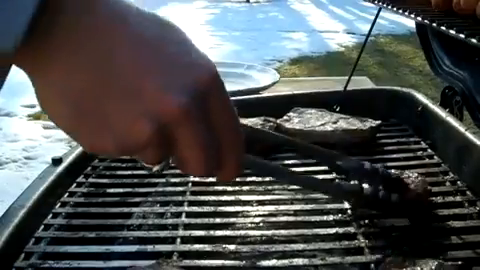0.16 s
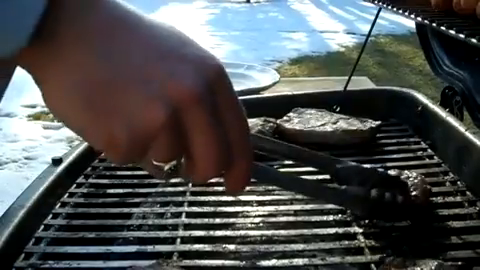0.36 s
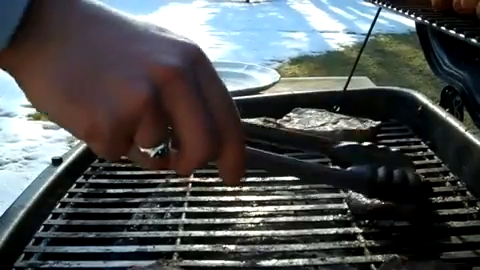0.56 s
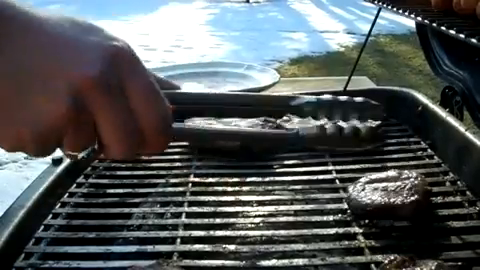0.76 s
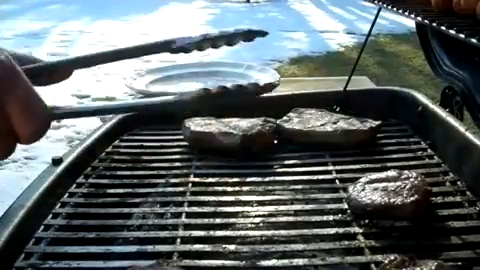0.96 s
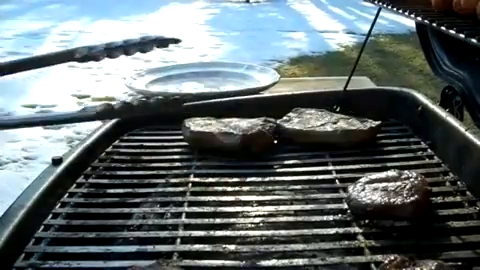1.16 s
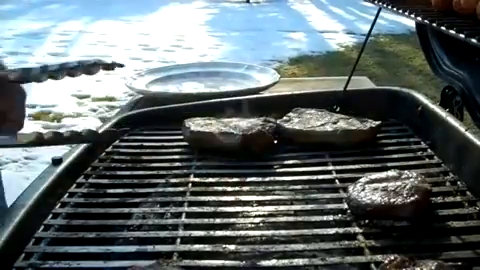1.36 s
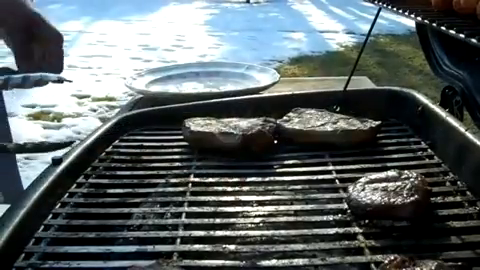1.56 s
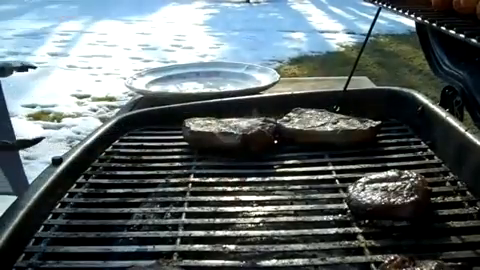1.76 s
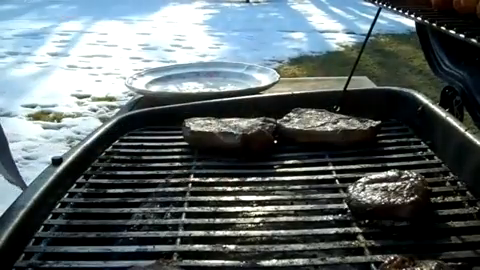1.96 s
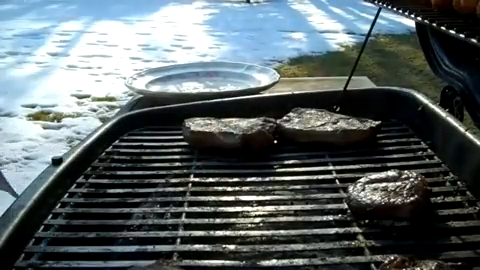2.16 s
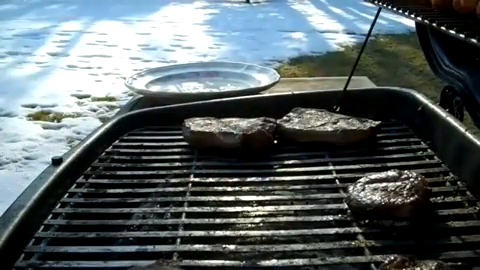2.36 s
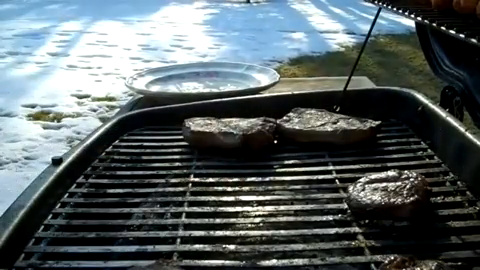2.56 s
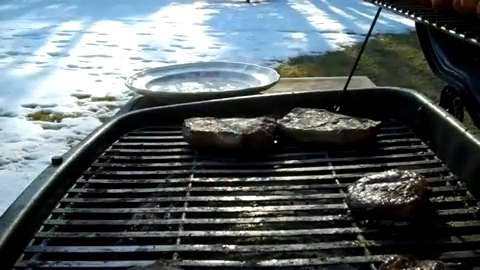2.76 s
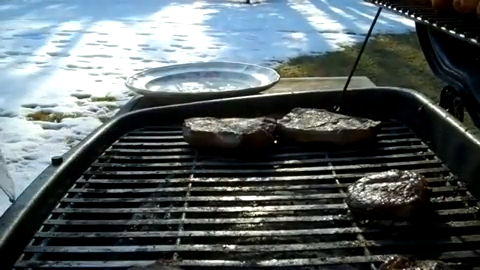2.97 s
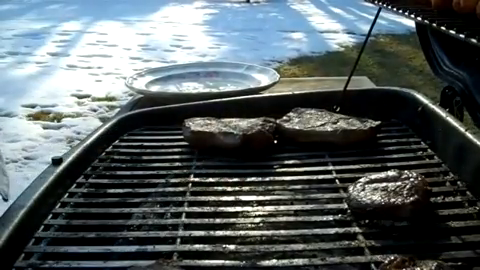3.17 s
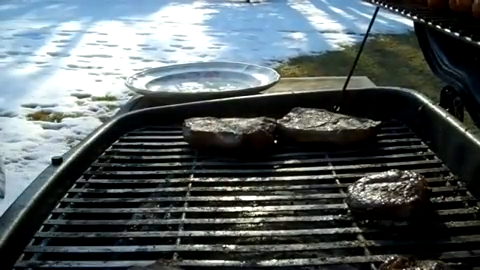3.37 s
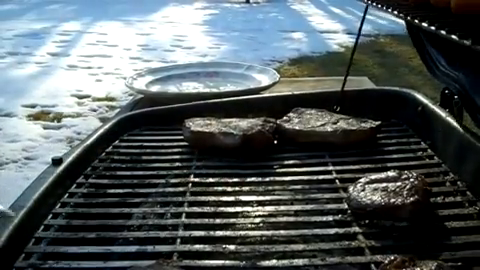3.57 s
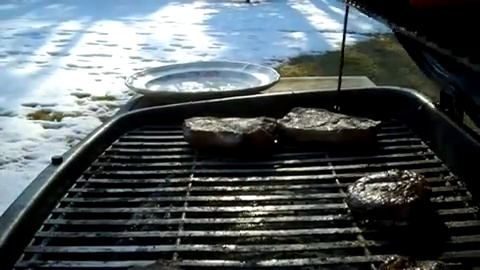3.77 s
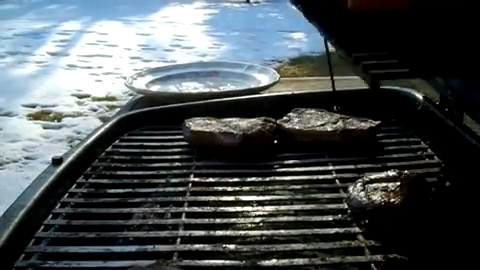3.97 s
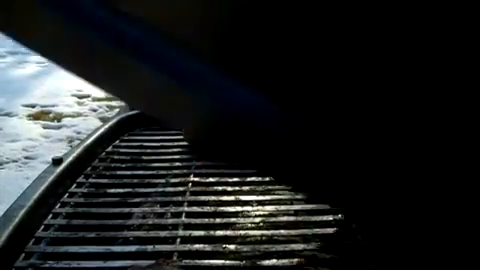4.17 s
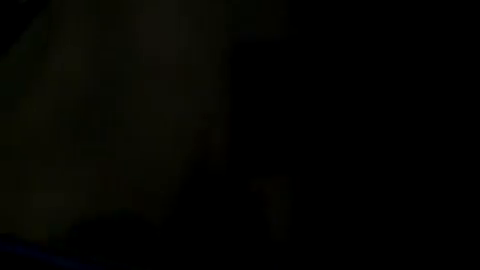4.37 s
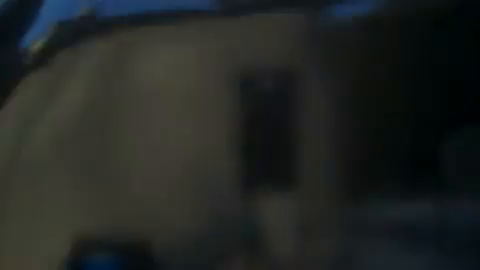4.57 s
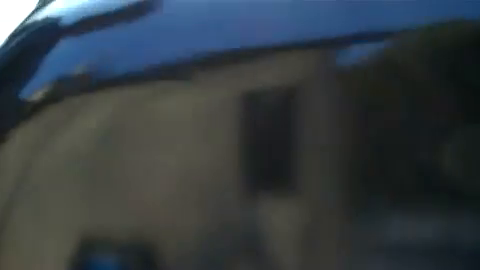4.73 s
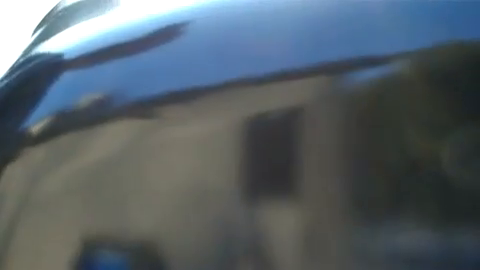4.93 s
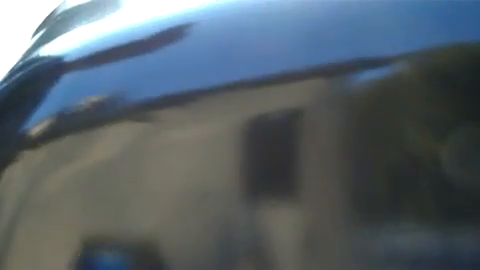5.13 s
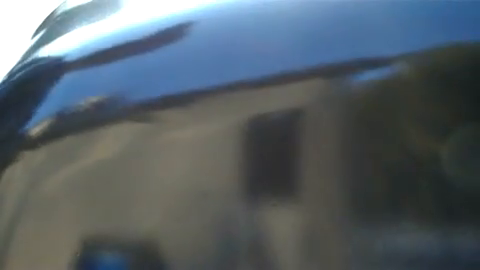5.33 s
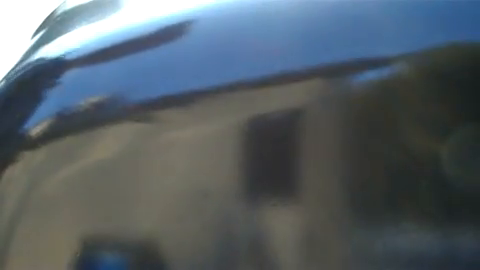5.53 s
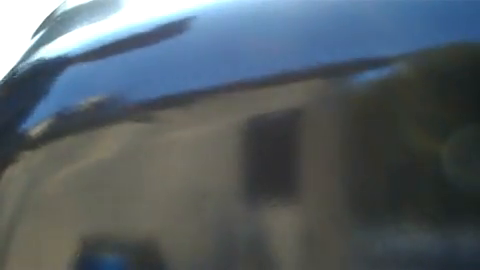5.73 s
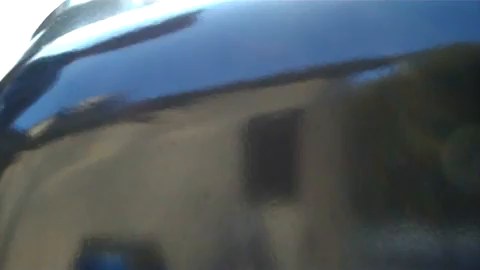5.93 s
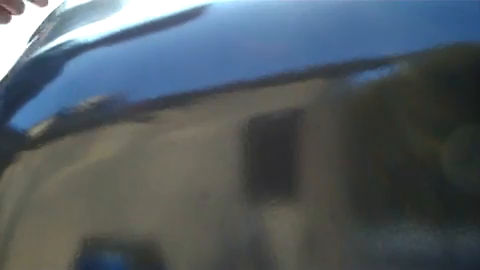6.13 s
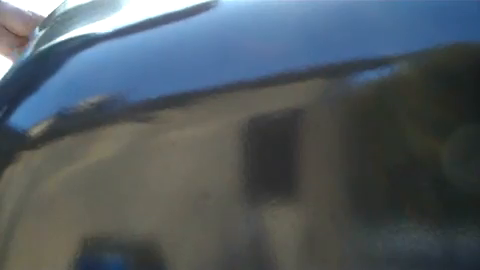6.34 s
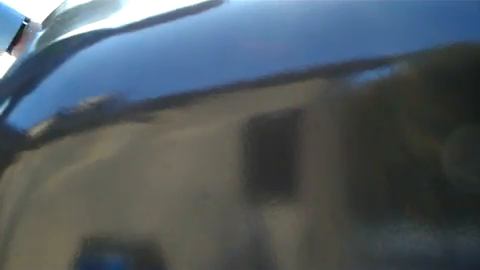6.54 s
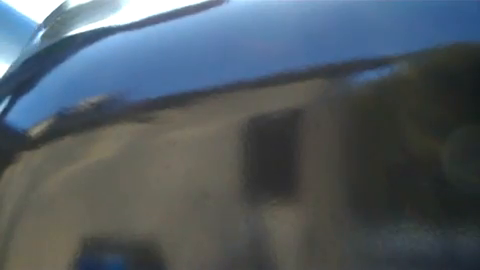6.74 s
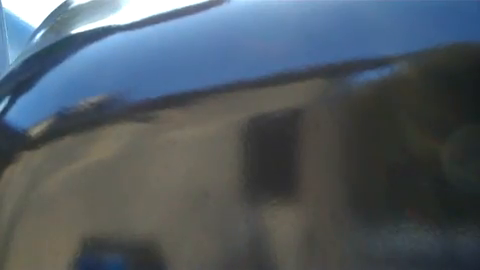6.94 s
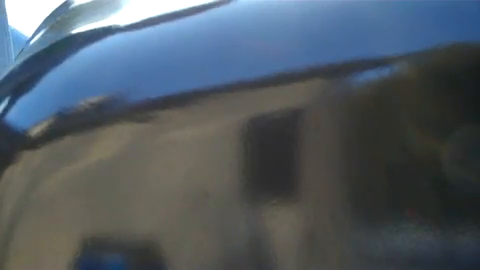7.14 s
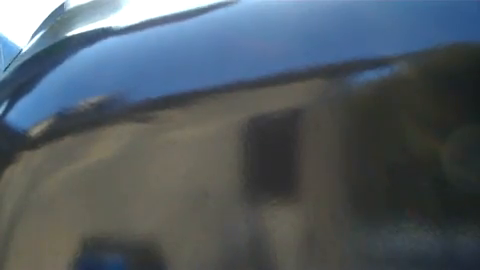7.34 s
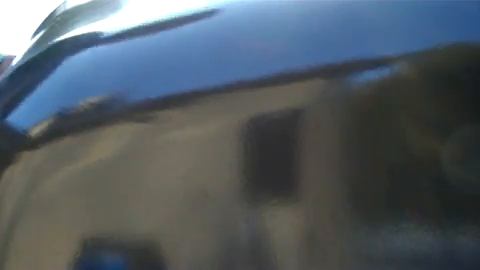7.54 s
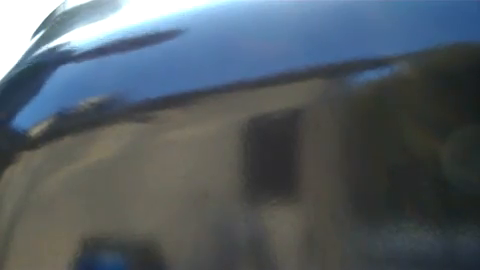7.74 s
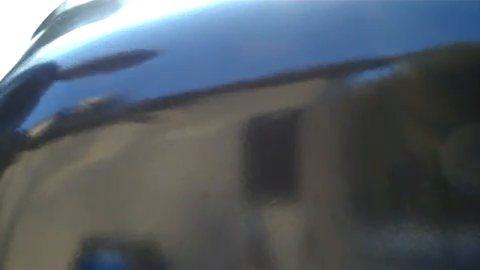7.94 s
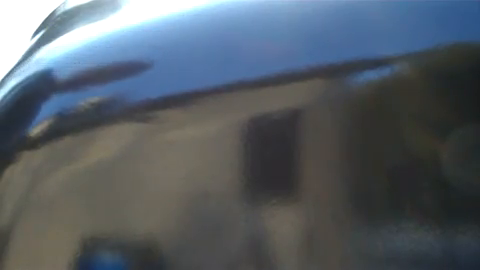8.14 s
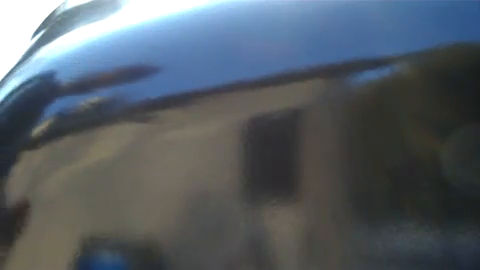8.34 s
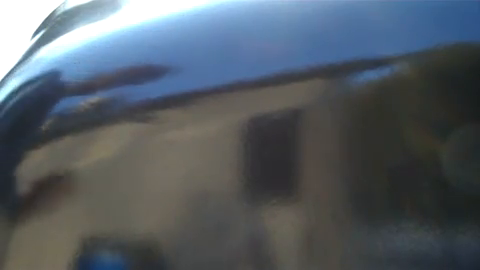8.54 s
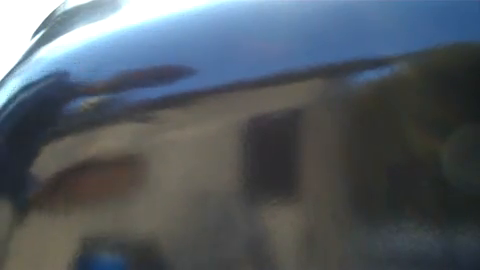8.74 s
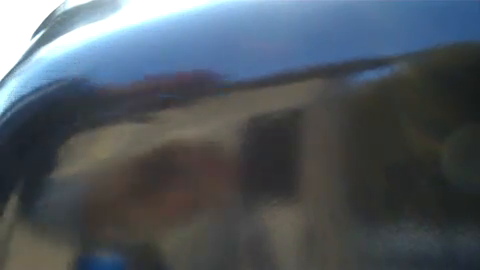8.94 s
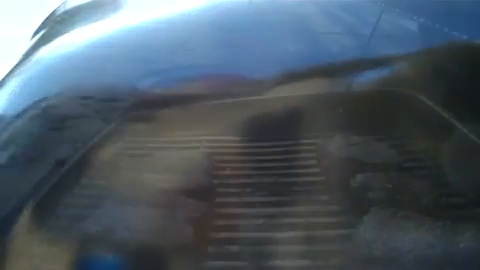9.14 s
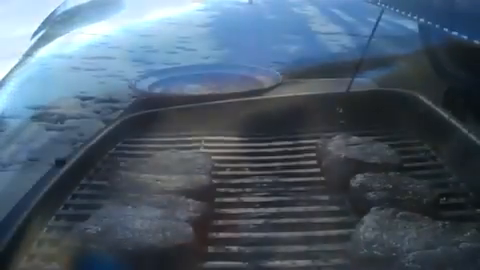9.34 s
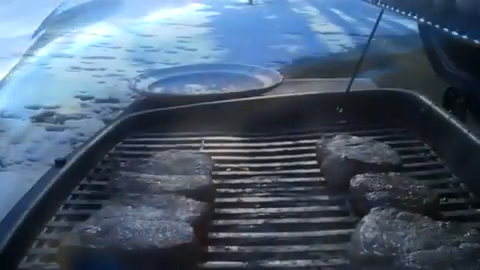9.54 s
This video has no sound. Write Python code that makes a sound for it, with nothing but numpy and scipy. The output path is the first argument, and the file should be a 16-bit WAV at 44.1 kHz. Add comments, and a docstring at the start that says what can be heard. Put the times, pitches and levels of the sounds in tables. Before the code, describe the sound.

Crackling fat hiss and flapping gas flames, tong ticks and scrapes, a ringing metal lid slam, a quieter muffled sizzle, then a bright rack clatter.

```python
"""At an outdoor gas grill steaks sizzle from the start, as dense random bubble pops over smooth hiss.
Noise in the flames' colour flutters and flaps; metal ticks, and tongs scrape as swelling, gritty noise.
The steel lid clanks shut in ringing modes and noise bursts; the fat is muffled and the flames settle.
A wire rack is knocked and rattles to rest, ringing over shaken firebox noise; at the end the lid lifts.
Two small microphone ports hear it, each with its own treble peaks, modelled as a filter per channel."""
import sys
import numpy as np
from scipy import signal
from scipy.fft import rfft, irfft
from scipy.io import wavfile
from scipy.ndimage import map_coordinates

SR = 44100
rng = np.random.default_rng(int(sys.argv[2]) if len(sys.argv) > 2 else 0)


def generate_wav(sig):
    """Save sig (samples, or channels by samples) to the path in sys.argv[1] as 16-bit PCM at SR."""
    pcm = np.round(np.clip(np.atleast_2d(sig).T, -1, 1) * 32767).astype(np.int16)
    wavfile.write(sys.argv[1], SR, pcm)


N = 427769
T = np.arange(N) / SR  # time in the scene, s
RING = T[:SR]  # time since a hit, s
TOP_HZ = 9700

# the flames settle once the lid keeps the air off: (start [s], end [s])
CALMING_S = (4.4, 5.97)


def undb(db):
    """Decibels to gain."""
    return 10 ** (np.asarray(db) / 20)


def unit(x):
    """Scale to rms 1."""
    return x / np.sqrt(np.mean(x ** 2))


def rfft_hz(x):
    """Frequency of each spectral bin."""
    return np.fft.rfftfreq(x.shape[-1], 1 / SR)


def colour(x, points):
    """Filter by (Hz, dB) points; the sound falls away 20 dB per octave beyond both ends."""
    hz, db = np.transpose(points)
    octave, known = np.log2(rfft_hz(x) + 1), np.log2(hz)
    beyond = np.abs(octave - np.clip(octave, known[0], known[-1]))
    gain = undb(np.interp(octave, known, db) - 20 * beyond)
    return irfft(rfft(x) * gain, x.shape[-1])


def spread(pair, alike_hz=3000):
    """Two unrelated signals become left and right: alike in the bass, apart in the treble."""
    alike = .97 / (1 + (rfft_hz(pair) / alike_hz) ** 2)
    mid, side = rfft(pair) * np.sqrt([(1 + alike) / 2, (1 - alike) / 2])
    return irfft(np.array([mid + side, mid - side]), pair.shape[-1])


def noise(points, size=N):
    """Coloured stereo noise of rms 1."""
    return unit(colour(spread(rng.standard_normal((2, size))), points))


def walk(rate):
    """Smooth random wandering of rms 1, with `rate` random knots per second."""
    knots = rng.standard_normal(4096)
    return unit(map_coordinates(knots, [T * rate], order=2, mode="wrap"))


def swell(age):
    """Rise to 1 at age 1, then die away."""
    age = np.maximum(age, 0)
    return age * np.exp(1 - age)


def fade(t60):
    """Exponential decay over one second, down 60 dB after t60 seconds."""
    return np.exp(-np.log(1000) * RING / t60)


def blow(x, db):
    """Set the level of the first 30 ms of a hit."""
    return x * undb(db) / np.sqrt(np.mean(x[:, :SR * 3 // 100] ** 2))


def modes(table, scatter_db, split, apart_hz=5000):
    """Ring of a struck body: close pairs of modes, weighted anew by each blow."""
    out = 0
    pairs = table + table
    for (hz, db, t60), draw in zip(pairs, rng.standard_normal((len(pairs), 4))):
        size, phase, lag, detune = draw
        # high modes reach the two ports out of step
        angle = np.pi * phase + np.array([[1], [-1]]) * lag * hz / apart_hz
        wave = np.sin(2 * np.pi * hz * (1 + split * detune) * RING + angle)
        out = out + undb(db + scatter_db * size) * fade(t60) * wave
    return out


def sheet(ripple_db=5, order=330):
    """The crowded upper resonances of sheet steel, as random (Hz, dB) filter points."""
    ripple = ripple_db * np.clip(rng.standard_normal(order), -2, 2)
    return np.transpose([np.linspace(30, TOP_HZ, order), ripple])


def add(out, s, sound):
    """Mix a sound in at time s."""
    start = int(s * SR)
    out[:, start:start + sound.shape[1]] += sound[:, :N - start]


def sizzle():
    """Thousands of tiny steam bubbles burst in the fat, over the smooth hiss of their echoes in the firebox."""
    # colour of the frying fat: (frequency [Hz], density [dB per Hz])
    fat = [(700, -6), (1700, -10.5), (2600, 1.5), (4000, 4), (6000, -2.5), (8000, -2.5), (9700, -2.5)]
    # fat heard from outside the shut lid, against the open grill: (frequency [Hz], gain [dB])
    muffle = [(100, -4), (2000, -3), (4500, -2), (6000, 0.5), (8000, 0), (9700, -5)]
    # the lid comes down and lifts again: (time [s], share shut [0-1])
    lid_shut = [(4.15, 0), (4.65, 0.87), (9.25, 0.91), (9.64, 0)]
    # juice runs onto hot metal, seethes and boils away:
    # (time [s], added level before waver [dB], time to peak [s])
    seethes = [(.25, -43, 0.11), (.88, -50.5, 0.15), (5.2, -56.5, 0.47)]
    pops_per_s, pop_spread_db, pop_cap_db = 9000, 2.7, 11
    hiss_db, ripple_db = -1, 2.0
    fry_db, lid_loss_db, heat_db_per_s = -47, -11.5, 0.67
    flicker_db, drift_db = 0.74, 0.23

    burst = rng.random(N) < pops_per_s / SR
    size = undb(np.minimum(pop_spread_db * rng.exponential(size=N), pop_cap_db))
    pops = unit(colour(spread(burst * size * rng.standard_normal((2, N))), fat))
    hiss = undb(hiss_db) * noise(fat)
    # reflections from the steel walls ripple the spectrum
    fry = unit(colour(pops + hiss, sheet(ripple_db)))

    shut = np.clip(np.interp(T, *np.transpose(lid_shut)), 0, 1)
    # the longer the lid stays down, the hotter the fat
    heat_db = heat_db_per_s * np.cumsum(shut) / SR
    power = undb(fry_db + lid_loss_db * shut + heat_db) ** 2
    for s, db, rise_s in seethes:
        power = power + (undb(db) * swell((T - s) / rise_s)) ** 2
    waver = undb(flicker_db * walk(34) + drift_db * walk(3))
    heard = (1 - shut) * fry + shut * colour(fry, muffle)
    return heard * np.sqrt(power) * waver


def flames():
    """The draught makes the flames flutter and now and then flap; under the lid the even gas flow is left."""
    # flames in the hollow of the grill: (frequency [Hz], density [dB per Hz])
    flame_colour = [(40, -23), (100, -14), (200, -1), (330, -6), (420, 3), (600, 2.5), (700, -2), (850, 0),
                    (1050, -5.5), (1230, 0.5), (1400, -7), (1800, -13), (4000, -14)]
    # steady gas flow in the firebox: (frequency [Hz], density [dB per Hz])
    gas_colour = [(25, -2), (70, -6.5), (130, -4.5), (190, 8.5), (270, -3), (500, -3), (800, -2.5),
                  (1100, -3), (1280, -2), (1500, -5.5), (3000, -5.5)]
    # draught on the flames under the open lid: (time [s], level before trim [dB])
    draught = [(0, -54.5), (0.5, -49.5), (0.92, -58), (1.13, -47), (1.3, -53), (1.6, -51.5), (1.72, -46.5),
               (2.03, -46), (2.15, -54.5), (2.7, -51), (3.4, -46), (3.6, -45.5), (3.7, -51), (3.85, -47)]
    # loudest flaps of the flame: (time [s], peak before trim [dB], length at full strength [s])
    flaps = [(0.116, -33, 0.031), (0.261, -34.5, 0.028), (0.321, -37, 0.03), (0.41, -36.5, 0.027),
             (0.805, -33.5, 0.032), (0.964, -36.5, 0.032), (1.011, -34, 0.03), (1.356, -35, 0.03),
             (1.544, -32.5, 0.026), (1.681, -31.5, 0.029), (1.957, -34, 0.026), (2.304, -35, 0.026),
             (2.489, -31.5, 0.032), (2.994, -36, 0.03), (3.092, -33.5, 0.026), (3.305, -31, 0.03),
             (3.39, -30.5, 0.033)]
    draught_trim_db, flap_trim_db, shut_db, gas_db = 2.5, -8, -21, -56.5
    flutter_db, flutter_rate = 2.8, 36  # rate in knots per second
    attack_s, release_s = 0.0091, 0.0059

    db = np.interp(T, *np.transpose(draught)) + np.interp(T, CALMING_S, [0, shut_db])
    flutter = flutter_db * np.clip(walk(flutter_rate), -2, 2)
    strength = undb(db + draught_trim_db + flutter)
    for s, peak_db, length in flaps:
        flap = np.interp(T - s, [-attack_s, 0, length, length + release_s], [0, 1, 1, 0])
        strength = np.maximum(strength, flap * undb(peak_db + flap_trim_db))
    return strength * noise(flame_colour) + undb(gas_db) * noise(gas_colour)


def burner_tube(hz=1230, width=0.051, open_db=-55, shut_db=-72):
    """Gas rushing through the burner tube sounds its breathy resonance."""
    peak = [(hz * (1 - 2 * width), -20), (hz, 0), (hz * (1 + 2 * width), -20)]
    return noise(peak) * undb(np.interp(T, CALMING_S, [open_db, shut_db]))


def breeze(db=-74):
    """Faint moving air buffets each microphone port on its own, as unrelated low noise."""
    # colour of the buffeting: (frequency [Hz], density [dB per Hz])
    air = [(20, -9.5), (50, -17), (90, 0), (160, -9.5)]
    gust_db = 2.5 * walk(1.5)
    return unit(colour(rng.standard_normal((2, N)), air)) * undb(db + gust_db)


def handling(grit_db=2, grit_rate=200):
    """Metal ticks as short noise bursts; tongs and lid rub unevenly, swelling quickly and dying away."""
    # small ticks of metal: (time [s], level [dB], pitch [Hz], width [octaves], t60 [s])
    ticks = [(3.0227, -35, 1980, 2.6, 0.03), (5.508, -63, 7900, 0.27, 0.023),
             (5.548, -53, 7540, 0.11, 0.018), (8.632, -66, 7000, 0.46, .015), (9.386, -52, 1790, .8, .03),
             (9.4, -54, 7000, 0.73, 0.019)]
    # tongs and lid rubbing, levels before grit: (time [s], length [s], rumble [dB], scrape [dB])
    rubs = [(0.303, .07, -52, -36.5), (2.698, 0.032, -46.5, -38.5), (2.745, 0.12, -59, -41),
            (3.888, 0.19, -36, -41.5), (4.087, 0.1, -37, -62), (4.263, 0.31, -41.5, -45),
            (5.112, 0.17, -38.5, -47), (5.323, 0.11, -51.5, -50), (8.157, .033, -54, -59),
            (8.455, 0.13, -47.5, -52.5), (8.974, 0.11, -49, -57), (9.379, 0.063, -52.5, -48.5)]
    # low and high noise of the rubs: (frequency [Hz], density [dB per Hz])
    rumble = [(30, -16), (60, -8.5), (95, -2), (200, 0.5), (290, -3), (450, 7), (650, -5), (1000, -7.5),
              (2000, -12)]
    scrape = [(500, -17), (1800, 3.5), (4500, 8.5), (7000, -6.5), (9700, -4.5)]

    out = np.zeros((2, N))
    for s, db, hz, octaves, t60 in ticks:
        peak = [(hz / 2 ** octaves, -8), (hz, 0), (hz * 2 ** octaves, -8)]
        add(out, s, blow(noise(peak, size=SR) * fade(t60), db))
    for s, length, rumble_db, scrape_db in rubs:
        pressure = swell(4 * RING / length)  # strongest a quarter of the way in
        rub = undb(rumble_db) * noise(rumble, size=SR) + undb(scrape_db) * noise(scrape, size=SR)
        grit = np.interp(RING * grit_rate, np.arange(256), rng.standard_normal(256))
        add(out, s, rub * pressure * undb(grit_db * grit))
    return out


def lid():
    """Each blow dents the shell with a thud, booms it, clatters its dense upper modes and snaps the hinge."""
    # blows on the lid, levels before trims:
    # (time [s], shell [dB], clatter [dB], hinge [dB], strap [dB], contact t60 [s])
    clanks = [(4.091, -39, -28.5, -18.5, -37.5, 0.18), (4.432, -39, -28, -28, -40, 0.13),
              (4.535, -28, -32.5, -47, -59, 0.19), (4.872, -56, -66, -39.5, -68, 0.061),
              (4.896, -40.5, -26.5, -25, -32.5, 0.15)]
    # ringing modes of the steel lid: (frequency [Hz], relative level [dB], t60 [s])
    lid_modes = [(190.5, -16, 0.8), (302, -23, .3), (371, -0.5, 0.85), (419.6, -0.5, 0.99), (466, -7, 0.95),
                 (536, -2, 0.8), (570, -12.5, 0.7), (597, -5, 0.93), (620, -22, 0.76), (710, -5, 0.37),
                 (767, 1.5, 0.3), (819, -7.5, 0.85), (975, -15, 0.79), (1050, -11.5, 0.87),
                 (1240, -16, 0.4), (1470, -20, 0.56), (1720, -30, .3), (1960, -22, 0.75)]
    # hinge strap, ringing on after each snap: (frequency [Hz], relative level [dB], t60 [s])
    strap_modes = [(758, -6.5, 0.63), (994, -3, .6), (1040, 2, 0.92), (1990, -3, 0.65), (2040, -11, 0.65),
                   (4300, -8, .25), (5300, 2, .18), (5760, 1, 0.1), (5910, 1.5, 0.14), (7500, -9, 0.17),
                   (8820, 3.5, 0.17)]
    # noise of the shell, the clatter and the hinge: (frequency [Hz], density [dB per Hz])
    shell_colour = [(60, -16), (200, -11), (480, 7.5), (800, -4.5), (1400, -16.5), (2500, -19)]
    clatter_colour = [(500, -21), (1100, 0.5), (2000, 1.5), (3500, 6), (4800, -0.5), (6500, -10)]
    hinge_colour = [(3500, -32), (5500, 2.5), (6200, 3.5), (7300, 1), (8000, 4.5), (8800, -10),
                    (9700, -0.5)]
    thud_hz, thud_t60, thud_trim_db = 450, 0.023, -3
    shell_t60, wash_trim_db, hinge_trim_db = 0.89, -3.0, -6
    crack, crack_t60, rise_s = 1.7, 0.02, 0.002
    clatter_hang = 2.07  # the clatter outlasts the contact by this factor

    out, steel = np.zeros((2, N)), sheet()
    rise = np.minimum(RING / rise_s, 1)
    thud = np.tile(np.sin(2 * np.pi * thud_hz * RING) * fade(thud_t60) * rise, (2, 1))
    for s, shell_db, clatter_db, hinge_db, strap_db, t60 in clanks:
        contact = (fade(t60) + crack * fade(crack_t60)) * rise
        wash = noise(shell_colour, size=SR) * fade(shell_t60)
        clatter = colour(noise(clatter_colour, size=SR), steel) * fade(clatter_hang * t60)
        hinge = colour(noise(hinge_colour, size=SR), steel) * contact
        add(out, s, blow(thud, shell_db + thud_trim_db))
        add(out, s, blow(modes(lid_modes, scatter_db=1.5, split=0.0021), shell_db))
        add(out, s, blow(modes(strap_modes, scatter_db=2, split=.003), strap_db))
        add(out, s, blow(wash, shell_db + wash_trim_db))
        add(out, s, blow(clatter, clatter_db))
        add(out, s, blow(hinge, hinge_db + hinge_trim_db))
    return out


def rack():
    """The loose wire rack is knocked, bounces to rest and shakes the firebox."""
    # bounces of the rack: (time [s], level before trims [dB])
    bounces = [(6.7521, -23), (6.786, -25.5), (6.819, -34.5), (6.884, -25), (6.955, -38.5), (7.042, -31.5),
               (7.1, -45.5), (7.165, -36), (7.24, -40), (7.275, -43.5), (7.366, -50.5), (7.476, -50),
               (7.536, -50.5), (7.598, -48.5), (7.766, -52)]
    # ringing modes of the rack: (frequency [Hz], relative level [dB], t60 [s])
    rack_modes = [(387, -11.5, 1.7), (440, -15, 1.6), (532, -12, 1.5), (570, -8.5, 1.6), (855, -9.5, 0.36),
                  (1022, -12.5, 1.06), (1237, -5.5, 0.68), (1287, -10.5, 0.84), (1580, -1, 0.24),
                  (2006, -7.5, 0.51), (2420, -5.5, 0.29), (2940, 3, 0.12), (3000, 5.5, 0.19),
                  (3520, -17, 0.091), (3730, 1, 0.068), (4040, 3.5, 0.18), (4340, -4, 0.19),
                  (4400, -2, 0.11), (4750, -12, .08), (5200, -4, 0.14), (5960, -0.5, 0.13),
                  (6070, -32, 0.17), (6770, -17, .2), (7300, -16, 0.22), (8700, -13, 0.18)]
    # noise of the wires, and hollow ring of the firebox: (frequency [Hz], density [dB per Hz])
    wire_colour = [(400, -8), (1200, -1), (3000, 5), (5000, 3), (7000, -5), (9700, -3)]
    firebox = [(30, -16), (90, -5), (190, 2), (290, -2), (420, 3), (570, 4), (720, -6.5), (900, -5.5),
               (1250, -2.5), (1700, -9)]
    contact_s, chatter, touch_rise_s = 0.01, 1.2, 0.0024
    wire_t60, wire_trim_db, ring_trim_db = 0.22, -7, -4.5
    body_t60, body_trim_db, body_rise_s = 1.07, -15, 0.044
    # the knock is a hard, bright contact; then the rack falls back under its own weight, duller
    knock_hz, knock_s, fall_hz = 5350, .1, 3010
    stress_db, pitch_scatter, bass_ratio = 6, 0.043, 0.1

    out = np.zeros((2, N))
    # the wires buzz hard for as long as they touch, then ring freely
    touch = 1 + chatter / (1 + (RING / contact_s) ** 8)
    touch = touch * np.minimum(RING / touch_rise_s, 1)
    body_rise = np.minimum(RING / body_rise_s, 1)
    for s, db in bounces:
        wires = blow(noise(wire_colour, size=SR) * fade(wire_t60) * touch, db + wire_trim_db)
        ring = blow(modes(rack_modes, scatter_db=4.5, split=0.00823) * touch, db + ring_trim_db)
        body = blow(noise(firebox, size=SR) * fade(body_t60), db + body_trim_db) * body_rise
        # each point of contact stresses its own pitch and damps what lies far above and below it
        centre_hz = knock_hz if s - bounces[0][0] < knock_s else fall_hz
        hz = centre_hz * np.exp(pitch_scatter * rng.standard_normal())
        stress = [(20, -8), (hz * bass_ratio, 0), (hz * 0.33, 0), (hz, stress_db),
                  (hz * 1.6, -2), (hz * 2, -8), (SR, -8)]
        padded = np.pad(wires + ring + body, ((0, 0), (0, SR)))
        add(out, s, colour(padded, stress)[:, :SR])
    return out


def scene():
    """Everything at the grill."""
    return sizzle() + flames() + burner_tube() + breeze() + handling() + lid() + rack()


def record(dry):
    """Each port has its own treble peaks; the loudest peaks are rounded and the top is cut."""
    # response of the microphone ports: (frequency [Hz], left gain [dB], right gain [dB])
    ports = [(1000, 0.05, -1.06), (3840, -3.5, -4.5), (4890, 1.5, 1), (6026, 9.5, 14), (6400, 9, 14),
             (6710, 15.5, 1.5), (7360, 17, 8.5), (8400, 10, -6.5), (9400, 5.5, -3), (10300, -6, -20)]
    ceiling = .8  # full scale is 1
    hz, *sides = np.transpose(ports)
    gain = undb([np.interp(rfft_hz(dry), hz, db) for db in sides])
    heard = ceiling * np.tanh(irfft(rfft(dry) * gain, N) / ceiling)
    top_cut = signal.ellip(10, .2, 70, TOP_HZ, fs=SR, output="sos")
    return signal.sosfilt(top_cut, heard)


dry = scene()
out = record(dry)
generate_wav(out)
```